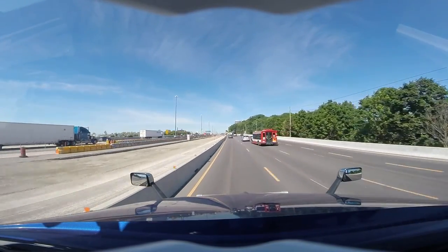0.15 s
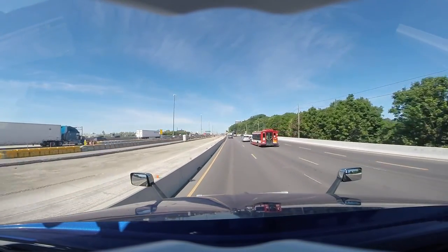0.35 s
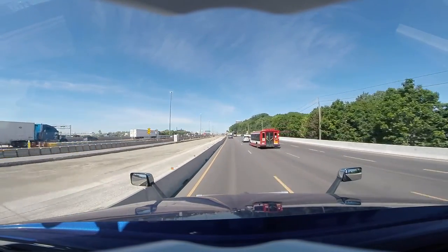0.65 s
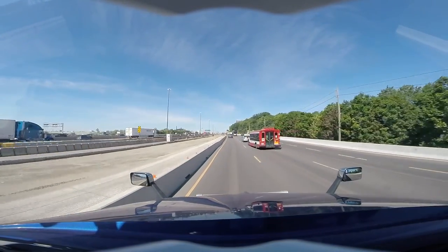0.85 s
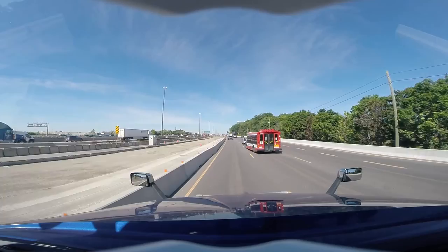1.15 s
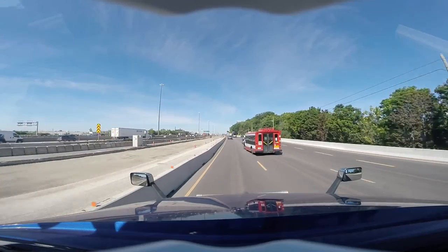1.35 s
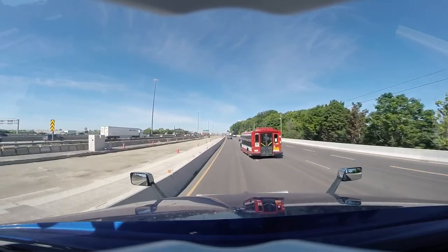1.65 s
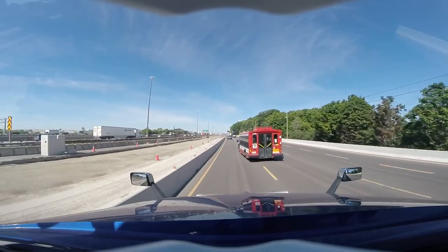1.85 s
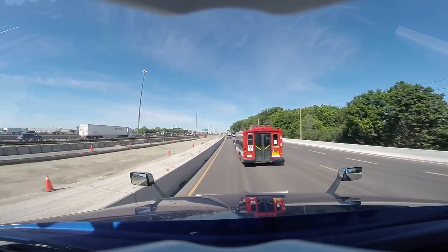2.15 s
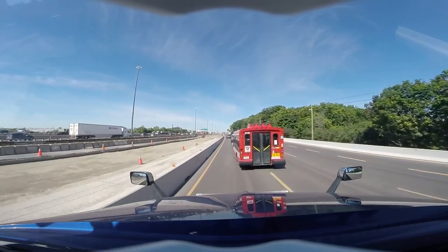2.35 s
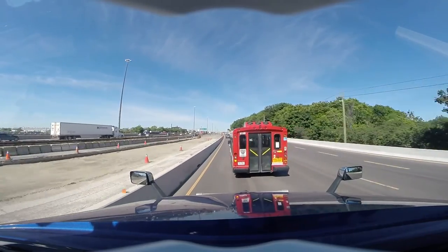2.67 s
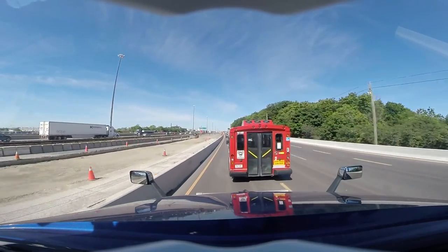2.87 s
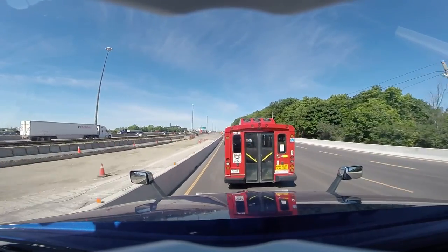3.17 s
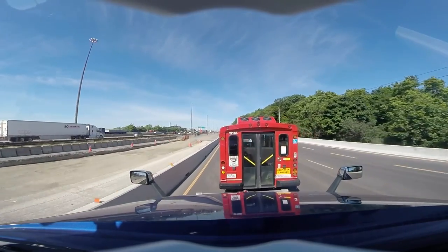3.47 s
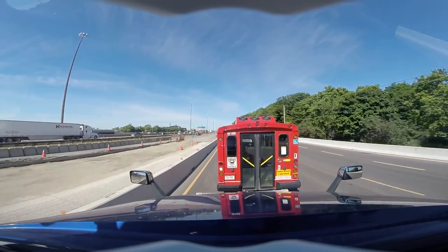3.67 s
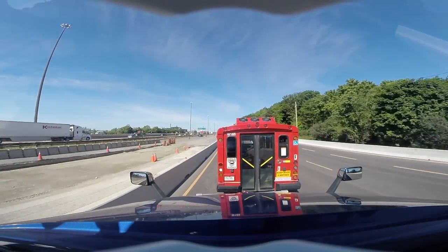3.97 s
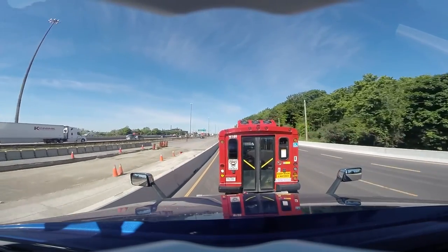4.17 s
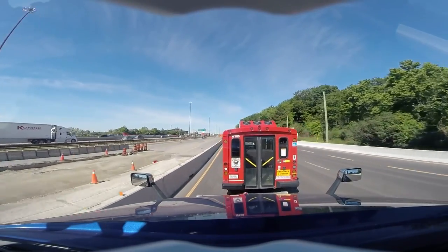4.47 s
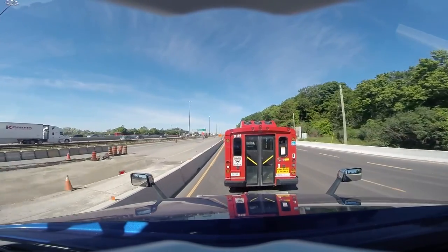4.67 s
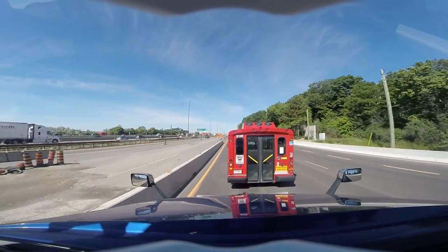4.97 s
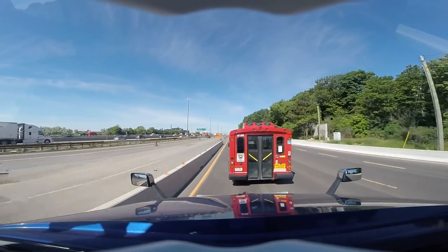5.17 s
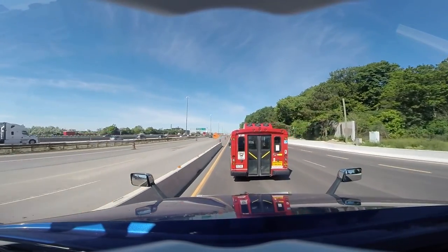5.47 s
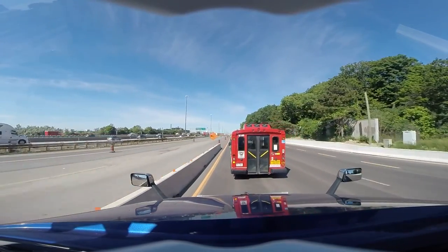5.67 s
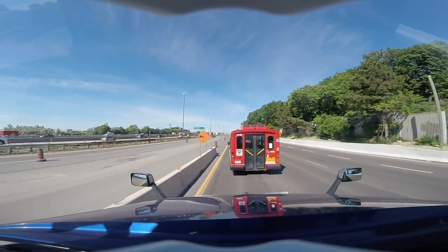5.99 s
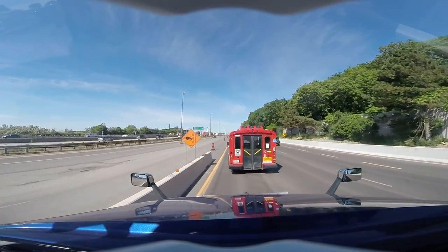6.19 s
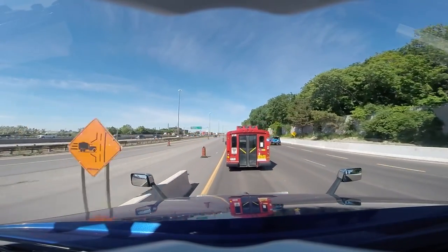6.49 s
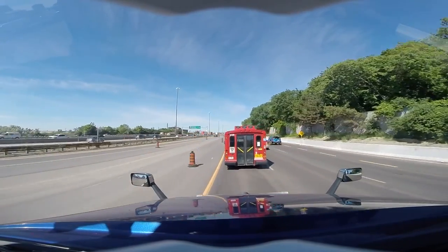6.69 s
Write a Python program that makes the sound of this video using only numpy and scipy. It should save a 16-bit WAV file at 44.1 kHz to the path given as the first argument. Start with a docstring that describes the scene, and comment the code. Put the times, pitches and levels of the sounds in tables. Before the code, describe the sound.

Low road roar and engine drone fill a truck cab at highway speed. With a small spit of air and a quick squawk, the air horn sounds one loud, brassy note for almost four seconds, pushing the road noise down. A brief squeak and scuff come midway through. The horn stops with a puff of air and the rumble swells back. The microphone is inside the cab, behind the windscreen.

```python
"""Inside a truck cab at highway speed. The driver pulls the air horn: the valve spits, the diaphragm
squawks, then chops the air into one brassy note that shimmers as its reflections shift and turns nasal
as the truck closes on a bus. Beneath it are road roar, engine drone, a slow boom of the cab air,
brief squeaks and scuffs, and at the end a faint turbo whistle.
An automatic gain control ducks the road under the horn and lets it swell back."""
import sys
import numpy as np
from scipy import signal
from scipy.fft import rfft, irfft, next_fast_len
from scipy.io import wavfile
from scipy.ndimage import uniform_filter1d

SR = 44100
rng = np.random.default_rng(int(sys.argv[2]) if len(sys.argv) > 2 else 0)


def to_wav(s):
    """Save 16-bit WAV."""
    ch = np.atleast_2d(s).T  # columns
    pcm = np.round(np.clip(ch, -1, 1) * 32767)  # PCM
    wavfile.write(sys.argv[1], SR, pcm.astype(np.int16))


N = 301644
TIME = np.arange(N) / SR
OPEN_S, SHUT_S = 1.709, 5.363   # the horn's air valve opens and shuts
COAST_S = (1.68, 4.84)   # the engine unloads between these times
CUTOFF_HZ = 15300


def horn(note_hz=283.44, sag_hz=1.6, sag_s=2.0, slack_sharp_hz=18, jitter_hz=0.094,
         build_s=.03, drain_s=.056, ring_s=.112, echo_depth=0.38, echo_rate=0.79):
    """Periodic flow: a diaphragm chops air into harmonics, which moving reflections swell and fade."""
    # harmonics as heard in the cab: (harmonic number, level/dB relative to the fundamental)
    partials = [(1, 0), (2, -24.5), (3, -22.5), (4, -17.5), (5, -18.5), (6, -18), (7, -16.5), (8, -11.5),
                (9, -30.5), (10, -25), (11, -29), (12, -28), (13, -29), (14, -27.5), (15, -34), (16, -36.5),
                (17, -35), (18, -38), (19, -32), (20, -34), (21, -38.5), (22, -39.5), (23, -41.5),
                (24, -47.5), (25, -44), (26, -50.5), (27, -45.5), (28, -48.5), (29, -50.5), (30, -48.5),
                (31, -47), (32, -46.5), (33, -49), (34, -50.5), (35, -43.5), (36, -54.5)]
    # spectral envelope of the harmonics above those: (f/Hz, level/dB)
    top_partials = [(10200, -54.5), (12200, -57.5), (12500, -53), (13600, -59.5), (13930, -51),
                    (14300, -61.5), (15200, -58.5)]
    # closeness of the reflecting bus ahead: (t/s, closeness from negative = far to positive = near)
    closeness = [(1.8, -1.45), (2.4, -1), (3.0, -0.96), (3.9, 0.06), (4.3, 1), (5.3, 1.4)]
    # nasal colour of its reflection: (f/Hz, gain/dB per unit of closeness)
    nasal = [(570, -2), (850, -1), (1137, -1), (1420, -3), (1700, -2), (2000, -1), (2300, -0.5),
             (2560, -5.5), (2840, 2.5), (3400, -2), (3850, 1.5), (4300, -3), (4830, -3.5), (5600, 2),
             (6500, -1.5), (8600, 1.5), (10000, -2), (12400, 1.5), (14000, -1.5)]
    # spectrum of the air rushing past the diaphragm: (f/Hz, level/dB)
    horn_air = [(400, -5), (1700, -9), (3200, -0.5), (5500, 1), (7000, -3), (10000, -10.5), (13000, -12.5),
                (15300, -25)]
    opened, draining = 1 - ease_off(OPEN_S, build_s), ease_off(SHUT_S, drain_s)
    pressure, near = opened * draining, in_time(closeness)[0]
    # the note sinks slowly to its settled pitch, and lies sharp while the pressure is low
    hz = note_hz + sag_hz * np.exp(-np.maximum(TIME - OPEN_S, 0) / sag_s)
    hz += slack_sharp_hz * (1 - draining + .5 * (1 - opened))
    phase = turning(hz + jitter_hz * drift(14)) + .004 * drift(160)
    # overtones are dull at low pressure, but the second and third harmonics bloom at half pressure
    dull_db_per_octave = 5 * (1 - opened) + 11 * np.sqrt(1 - draining)
    bloom_db = 22 * 2 * np.sqrt(pressure * (1 - pressure)) * opened
    listed_db = {round(k): db for k, db in partials}
    buzz = np.sin(phase)
    for k in range(2, int(CUTOFF_HZ / note_hz) + 1):
        own_db = listed_db.get(k, np.interp(k * note_hz, *np.transpose(top_partials)))
        path_db = near * np.interp(k * note_hz, *np.transpose(nasal))
        pressure_db = bloom_db * (k <= 3) - dull_db_per_octave * np.log2(k)
        gain = interference(k) * from_db(own_db + path_db + pressure_db)
        # the middle harmonics feel the changing path most; the slipstream adds a quick flutter
        echo = echo_depth * k ** 2 / (k ** 2 + 10 ** 2) / (1 + (k / 32) ** 4)
        rate = echo_rate * (1 + k / 20)
        flutter = (.04 + .006 * min(k, 22)) * drift(30) + .08 * drift(5)
        angle = k * phase + 2 * np.pi * rng.random() + 2 * echo * drift(rate)
        buzz += gain * (1 + echo * drift(rate) + flutter) * np.sin(angle)
    puffs = 1 + .5 * np.cos(phase)   # the air escapes once per cycle
    air = from_db(-40 - 2 * dull_db_per_octave) * noise(horn_air) * puffs
    level_db = -2 + 2 * near   # the nearer bus throws more sound back
    return from_db(level_db) * opened * ease_off(SHUT_S, ring_s) * (np.sqrt(2) * buzz + air)


def interference(harmonic):
    """Destructive interference: reflections briefly weaken a harmonic; unit-power gain over the blast."""
    # partial cancellations: (deepest at t/s, harmonic number, half length/s, depth/dB)
    fades = [(2.08, 4, .15, 7), (2.27, 10, .15, 9), (2.45, 6, .28, 4.5), (2.6, 7, .17, 5),
             (2.72, 2, .16, 12), (3.15, 3, .5, 10), (3.3, 9, .6, 11), (3.3, 11, .7, 14), (3.4, 8, .8, 5),
             (3.7, 4, .45, 3.5), (4.27, 3, .3, 15), (4.5, 17, .35, 7), (4.55, 5, .5, 5), (4.75, 4, .25, 7),
             (4.9, 12, .3, 11)]
    dips_db = (depth_db * swell(s, half_s) for s, k, half_s, depth_db in fades if k == harmonic)
    gain = from_db(-sum(dips_db, np.zeros(N)))
    blast = (TIME > OPEN_S) & (TIME < SHUT_S)
    return gain / np.sqrt(np.mean(gain[blast] ** 2))


def squawk(start_s=1.704, wobble_hz=9, rasp_db=-8, rasp_lag_s=0.014):
    """Onset transient: a higher mode of the diaphragm wavers amid sidebands spaced by the note, then air rasps
    as the note locks in."""
    # the squawk tone and its sidebands spaced by the note's fundamental: (f/Hz, relative level/dB)
    squawk_lines = [(757, 1), (1198, -16), (1340, -26), (1655, -18), (1955, -14), (2088, -26)]
    lowest_hz = squawk_lines[0][0]
    tones = sum(from_db(db) * np.sin(turning(hz + wobble_hz * hz / lowest_hz * drift(60)))
                for hz, db in squawk_lines)
    rasp = from_db(rasp_db) * noise([(200, -24), (700, 1), (2300, 1), (3500, -14.5), (12000, -42)])
    shape = dict(level_db=-8, attack_s=.013, length_s=.036, decay_s=.012)
    return envelope(start_s, **shape) * np.sqrt(2) * tones + envelope(start_s + rasp_lag_s, **shape) * rasp


def valve(rise_s=0.001):
    """Jet noise: compressed air spits out as the valve opens and as it shuts."""
    # spits of air: (t/s, level/dB, length/s, decay/s, low edge f/Hz)
    spits = [(1.615, -20.5, 0.015, 0.012, 2300), (1.66, -38, .008, 0.02, 1200),
             (1.675, -26.5, 0.011, .01, 900), (5.351, -6, 0.016, 0.012, 1250)]
    # spectrum of the jet: (f/Hz, level/dB)
    valve_air = [(300, -3), (1400, 15.5), (2400, 2), (3000, 8), (3700, 0), (4800, -1.5), (7500, -9.5),
                 (11000, -18), (13500, -20), (15500, -28)]
    air, out = noise(valve_air), 0
    for s, level_db, length_s, decay_s, low_hz in spits:
        hiss = rms_one(high_pass(air, low_hz))
        out += envelope(s, level_db, rise_s, length_s, decay_s) * hiss
    return out


def road():
    """Broadband noise: tyres and wind roar, crossfading at equal power from load to coasting."""
    # spectrum of the roar under load: (f/Hz, level/dB)
    loaded_spectrum = [(28, -38.5), (48, -3), (69, -7), (99, -3.5), (156, -2), (194, -8), (306, -7.5),
                       (389, -10.5), (531, -16.5), (585, -14.5), (799, -15.5), (1150, -23.5), (2410, -28),
                       (15000, -68)]
    # spectrum of the roar when coasting: (f/Hz, level/dB)
    coasting_spectrum = [(28, -32), (48, 2.5), (60, -6.5), (96, -6), (164, -7), (258, -9.5), (321, -5),
                         (361, -12.5), (675, -16), (880, -18.5), (968, -19), (1150, -24), (2360, -27.5),
                         (15000, -69)]
    # strength of the roar: (t/s, level/dB)
    levels = [(0, -15.5), (1.0, -18), (1.55, -17.5), (3.0, -19), (5.5, -14.5), (6.2, -19), (6.84, -19)]
    coasting = np.interp(TIME, COAST_S, [0, 1])
    roar = np.sqrt(1 - coasting) * noise(loaded_spectrum) + np.sqrt(coasting) * noise(coasting_spectrum)
    flutter_db = .5 * drift(14)
    return from_db(in_time(levels)[0] + flutter_db) * roar


def cab_boom(mode_hz=28.2, width_hz=7, resting_db=-24):
    """Cavity resonance: buffeting keeps the cab air swaying at its lowest mode."""
    # buffets that add to the boom: (peak at t/s, half length/s, level/dB)
    buffets = [(.3, .1, -28), (1.02, 0.16, -15.5), (1.62, .05, -20), (3.2, .6, -22), (4.7, .7, -9.5),
               (6.3, 0.97, -19.5)]
    sway = resonance(rng.standard_normal(N + SR), mode_hz, width_hz)[SR:]
    # strong swings are damped more than weak ones
    boom = rms_one(sway / np.abs(signal.hilbert(sway)) ** (2 / 3))
    buffeting = sum(from_db(db) * swell(s, half_s) for s, half_s, db in buffets)
    return (from_db(resting_db) + buffeting) * boom


def engine():
    """Narrow-band noise: rough drones whose balance changes as the truck starts to coast."""
    # engine and tyre drones: (f/Hz, resonator width/Hz, level under load/dB, level coasting/dB)
    drones = [(99.5, 9.6, -36.5, -21.5), (115.1, 5.2, -25.5, -28.5), (152.2, 9.1, -25, -35),
              (165.5, 14, -33, -28), (220.9, 3.5, -36.5, -32), (315.4, 8.4, -43, -28.5),
              (390.7, 8.8, -35, -59), (580.7, 20.4, -34, -38), (662, 12, -54.5, -35.5),
              (798, 16, -37.5, -48.5)]
    coasting, out = np.interp(TIME, COAST_S, [0, 1]), 0
    for hz, width_hz, load_db, coast_db in drones:
        drone = rms_one(resonance(rng.standard_normal(N), hz, width_hz))
        out += from_db(load_db + coasting * (coast_db - load_db)) * drone
    return out


def cab_friction(wobble_hz=16):
    """Friction: rubbing trim gives short gliding squeaks, and scuffs give dull bursts of noise."""
    # scuffs: (t/s, level/dB, attack/s, length/s, decay/s)
    scuffs = [(3.814, -20.5, 0.082, 0.13, .02), (3.958, -15.5, .02, 0.045, .014)]
    # their dull spectrum: (f/Hz, level/dB)
    scuff_spectrum = [(250, -29), (430, -7), (520, 0), (600, 0), (690, -2), (850, -10), (1200, -14),
                      (2000, -24), (5000, -42), (15000, -74)]
    # squeaks: (t/s, length/s, start f/Hz, end f/Hz, level/dB of each of harmonics 1 to 4)
    squeaks = [(1.345, .06, 2590, 2735, -39, -34, -52, -49), (3.846, .078, 2490, 2260, -9.5, -31, -49, -58)]
    out = sum(envelope(*row) for row in scuffs) * noise(scuff_spectrum)
    for s, length_s, start_hz, end_hz, *harmonic_db in squeaks:
        along = np.clip((TIME - s) / length_s, 0, 1)
        phase = turning(start_hz + (end_hz - start_hz) * np.sqrt(along) + wobble_hz * drift(120))
        tone = sum(from_db(db) * np.sin(k * phase) for k, db in enumerate(harmonic_db, 1))
        out += np.sin(np.pi * along) ** 2 * np.sqrt(2) * tone
    return out


def turbo(level_db=-69, wander_hz=60):
    """Rotor tone: a faint whistle climbs as the turbo gathers speed."""
    # rise of the whistle: (t/s, f/Hz, relative level/dB)
    hz, swell_db = in_time([(5.8, 9100, -42), (6.3, 9500, -11), (6.84, 10600, 0)])
    return from_db(level_db + swell_db) * np.sqrt(2) * np.sin(turning(hz + wander_hz * drift(80)))


def from_db(db):
    """Amplitude ratio of a level in decibels."""
    return 10 ** (np.asarray(db) / 20)


def rms_one(x):
    """Normalisation to unit power."""
    return x / np.sqrt(np.mean(np.abs(x) ** 2) + 1e-20)


def in_time(rows):
    """Linear interpolation: each column after t/s becomes a curve over all samples."""
    s, *columns = np.transpose(rows)
    return [np.interp(TIME, s, c) for c in columns]


def envelope(start_s, level_db, attack_s, length_s, decay_s):
    """Linear attack, a hold until the length is over, then exponential decay."""
    age = TIME - start_s
    decay = np.exp(-np.clip((age - length_s) / decay_s, 0, 20))
    return from_db(level_db) * np.clip(age / attack_s, 0, 1) * decay


def swell(centre_s, half_s):
    """Gaussian pulse: a smooth rise to 1 and fall back."""
    return np.exp(-np.minimum(((TIME - centre_s) / half_s) ** 2, 20))


def ease_off(start_s, length_s):
    """Gaussian decay: 1 until the start, then a smooth fall."""
    return np.where(TIME < start_s, 1, swell(start_s, length_s))


def drift(rate):
    """Low-pass random fluctuation of spread 1, changing about rate times a second."""
    step, settling = 40, 2000
    pole = np.exp(-2 * np.pi * rate * step / SR)
    white = rng.standard_normal(N // step + settling + 2)
    slow = signal.lfilter([1], [1, -2 * pole, pole * pole], white)[settling:]
    return np.interp(np.arange(N) / step, np.arange(len(slow)), rms_one(slow))


def noise(spectrum):
    """Spectral shaping: unit-power noise whose density follows rows of (f/Hz, relative level/dB)."""
    hz, level_db = np.transpose(spectrum)
    size = next_fast_len(N)
    bin_hz = np.maximum(np.arange(size // 2 + 1) * SR / size, 1)
    shape = from_db(np.interp(np.log(bin_hz), np.log(hz), level_db))
    return rms_one(irfft(rfft(rng.standard_normal(size)) * shape, size)[:N])


def turning(hz):
    """Phase as the integral of frequency, from a random start."""
    return 2 * np.pi * (np.cumsum(hz) / SR + rng.random())


def resonance(x, hz, width_hz):
    """Two equal two-pole resonators in cascade, each of the given bandwidth."""
    r = np.exp(-np.pi * width_hz / SR)
    resonator = [1, 0, -1], [1, -2 * r * np.cos(2 * np.pi * hz / SR), r * r]
    return signal.lfilter(*resonator, signal.lfilter(*resonator, x))


def high_pass(x, hz):
    """Second-order roll-off below the given frequency."""
    return signal.sosfilt(signal.butter(2, hz, "high", fs=SR, output="sos"), x)


def gain_control(x, threshold_db=-11.0, slope=0.99, release_db_per_s=15, attack_s=0.026):
    """Compression: the gain falls quickly on loud sound and recovers slowly; deep bass is discounted."""
    power = uniform_filter1d(high_pass(x, hz=120) ** 2, size=600)
    over_db = np.maximum(10 * np.log10(np.maximum(power, 1e-12)) - threshold_db, 0)
    release_db = release_db_per_s * TIME
    held_db = np.maximum.accumulate(over_db + release_db, axis=-1) - release_db
    pole = np.exp(-1 / (attack_s * SR))
    return x * from_db(-slope * signal.lfilter([1 - pole], [1, -pole], held_db))


def scene():
    """Superposition of all sources at one point behind the windscreen."""
    return (horn() + squawk() + valve() + road() + cab_boom() + engine() + cab_friction() + turbo())[None]


def record(dry, ceiling=.92):
    """Compression, soft saturation of the peaks, and a steep low-pass."""
    ducked = gain_control(dry)
    rounded = ducked / (1 + (ducked / ceiling) ** 8) ** (1 / 8)
    return signal.sosfilt(signal.ellip(12, .1, 90, CUTOFF_HZ, fs=SR, output="sos"), rounded)


dry = scene()
out = record(dry)
to_wav(out)
```